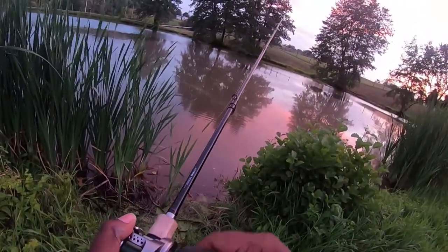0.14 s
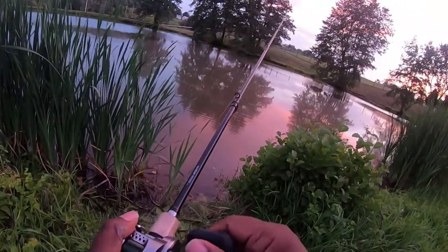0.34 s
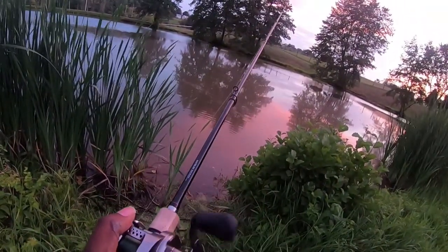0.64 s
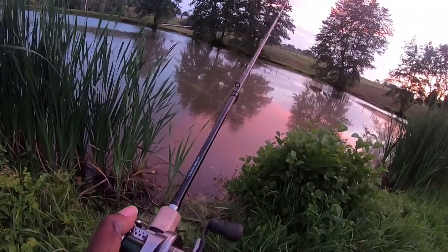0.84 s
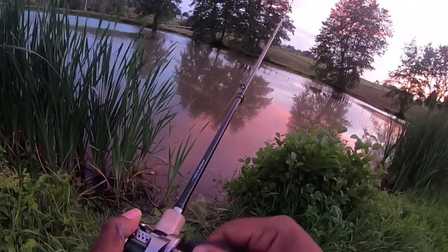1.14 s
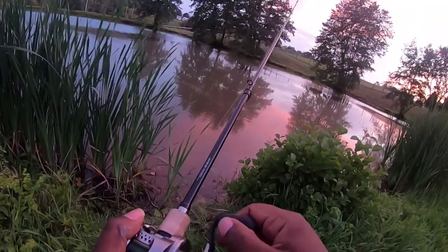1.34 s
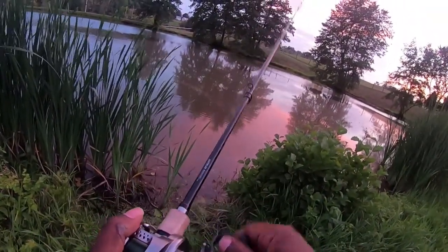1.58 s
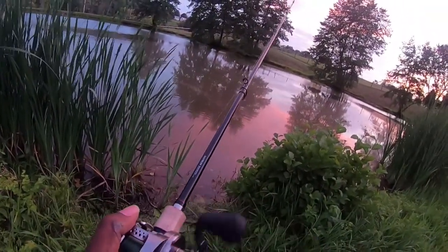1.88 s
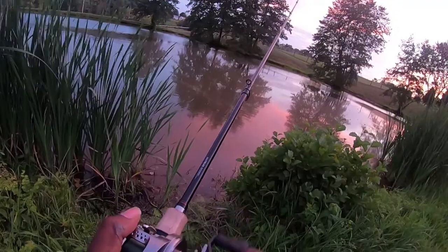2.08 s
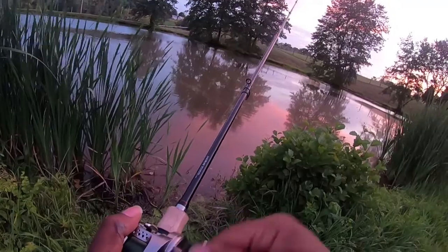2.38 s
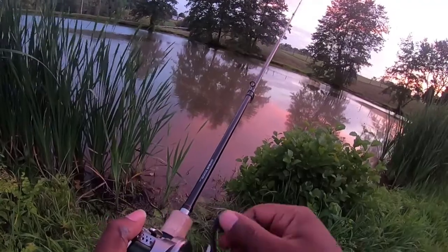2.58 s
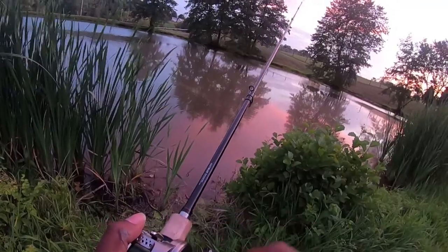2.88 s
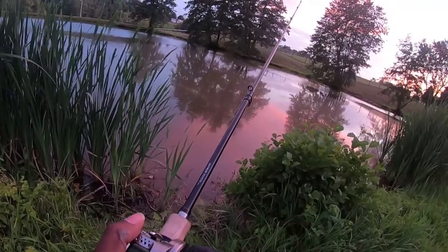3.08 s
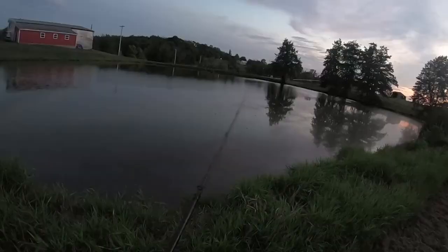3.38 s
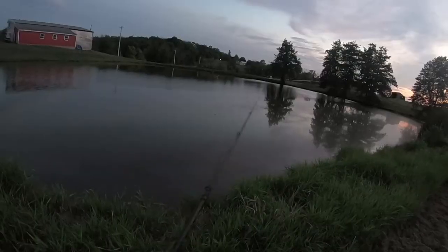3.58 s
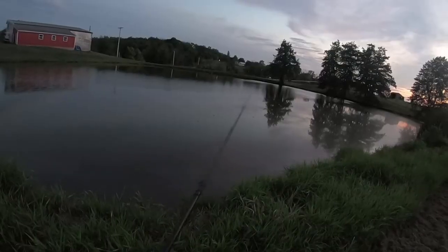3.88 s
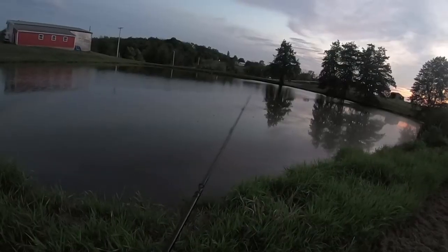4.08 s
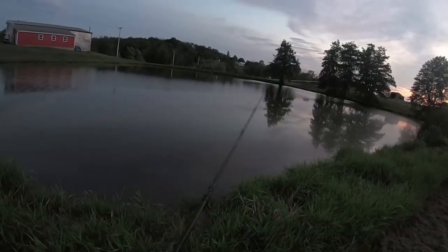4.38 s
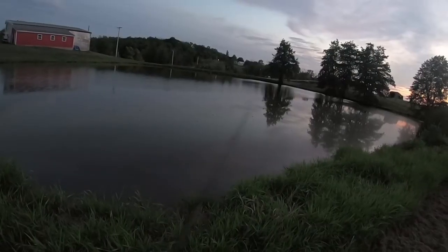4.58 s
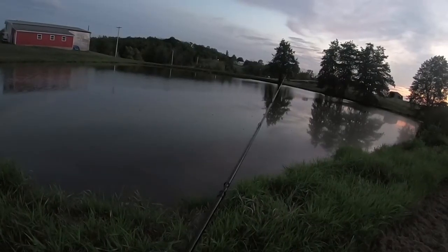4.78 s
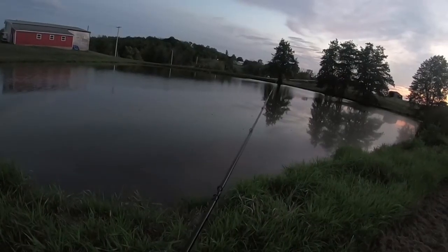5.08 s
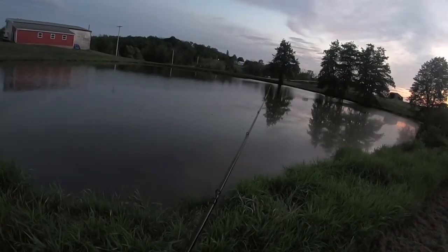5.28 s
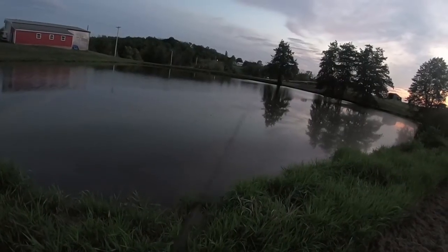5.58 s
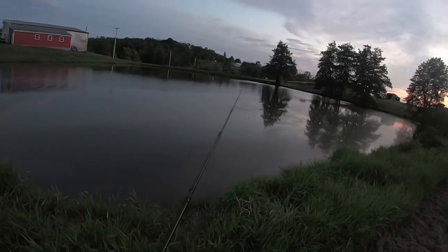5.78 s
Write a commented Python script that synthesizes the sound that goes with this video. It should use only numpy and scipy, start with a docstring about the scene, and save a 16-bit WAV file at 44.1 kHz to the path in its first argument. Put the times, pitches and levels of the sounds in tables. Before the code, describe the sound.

A close, high-pitched insect chorus hisses in reeds beside a pond, over a faint, distant road rumble. A cicada buzzes in surges about three times a second, growing louder, each ending in a small rising squeak, most with a rasp. At 0.2 seconds one short knock bumps the microphone. Low wind gusts buffet it until about 2 seconds, strongest near 0.1 and 0.6. A cricket gives short, pure chirps between 0.7 and 1.8 seconds, and a faint katydid ticks then buzzes thinly around 0.5 and 1.9. At 3.4 seconds the sound cuts abruptly to the quieter open bank, with the chorus farther off. Crickets trill, one insect buzzes in short bouts, and a small frog on the right peeps softly about twice a second. A distant pump motor hums low, throbbing gently and growing slightly louder from 4.1 seconds until the end, near 6 seconds.

```python
"""Dusk at a pond

First we stand in the reeds, close to a chorus of insects scraping their wings. A cicada surges, a
katydid ticks and buzzes, a cricket chirps and a breeze rumbles on the microphone. Then we are suddenly
on the open bank: the chorus is farther off, crickets trill, a small frog peeps through its ringing
throat and a distant pump motor hums louder. Land and road rumble far away in both spots."""
import sys
import numpy as np
from scipy import signal
from scipy.fft import rfft, irfft
from scipy.io import wavfile
from scipy.ndimage import map_coordinates

SR = 44100
rng = np.random.default_rng(int(sys.argv[2]) if len(sys.argv) > 2 else 0)


def put_to_file(sound):
    """Save the sound as 16-bit audio at rate SR, in the file named by the first command-line argument."""
    columns = np.atleast_2d(sound).T  # one column per channel
    safe = np.clip(columns, -1, 1)
    whole_steps = np.round(safe * 32767)
    wavfile.write(sys.argv[1], SR, whole_steps.astype(np.int16))


N = 261954
T = np.arange(N) / SR
HZ = np.maximum(np.fft.rfftfreq(N, 1 / SR), 1)
MOVE_S = 3.361   # when we jump from the reeds to the bank

# The basic tone of the insect crowd and far air noise.
# Each row: pitch in Hz, left and right level in dB per Hz, how alike the sides are from 0 to 1.
REED_CHORUS = [(284, -84.5, -83, 0.7), (545, -96.5, -96.5, 0.03), (1560, -91, -93.5, 0),
               (2110, -94.5, -95.5, 0.1), (3020, -94.5, -89.5, 0.6), (3444, -83, -84.5, 0.6),
               (3970, -81, -77.5, 0.74), (4420, -77, -77.5, 0.68), (5750, -74.5, -72.5, 0),
               (6470, -77.5, -76, 0), (7380, -78.5, -75, 0.48), (7820, -91, -81.5, 0.44),
               (9230, -86.5, -87.5, 0.35), (10870, -95.5, -99.4, 0), (12400, -100, -98, 0.1),
               (13700, -99.5, -102.8, 0.2), (15600.0, -111.9, -110.3, 0.38)]
BANK_CHORUS = [(293, -80.5, -80, 0.86), (577, -94, -91.5, 0.26), (900.0, -86.5, -92, 0.14),
               (1630, -86.5, -90, 0.42), (2010, -91.5, -99, 0.18), (2890, -90.5, -82.5, 0.32),
               (3200, -88.5, -86, 0.47), (4700, -87.0, -83.5, 0.58), (5800, -83, -81.5, 0.23),
               (6430, -93, -83, 0.52), (7020, -79.5, -77, 0.54), (7400, -89, -88, 0.58),
               (8500, -92, -91.5, 0.29), (10330, -104.0, -104.7, 0.15), (11000, -110.3, -111.2, 0.38),
               (13600, -115.8, -116.2, 0.34), (15600.0, -136.5, -136.3, 0.85)]
# Pitches that stand out or dip in the hiss of insects and far air.
# Each row: pitch in Hz, width in Hz, boost in dB.
REED_HISS_PITCHES = [(764, 330, 6), (3323, 120, 6), (3760, 60, 4), (4100, 150, 4.5), (4425, 35, 3),
                     (4952, 50, 4), (5264, 50, 3), (6400, 200, -3), (8440, 430, 5.5)]
BANK_HISS_PITCHES = [(2470, 58, 3.4), (2965, 150, 3.6), (7450, 100, 2.3), (10400, 160, 4.5)]
# The two microphone openings sit apart, so a wave meets them at different points in its cycle.
# Each row: pitch in Hz, how far the right side is ahead in radians.
REED_RIGHT_LEAD = [(6400, 0), (7300, 2.6), (7900, 3), (9500, 2.1), (11000, .2), (12300, .5), (14000, -.8)]
BANK_RIGHT_LEAD = [(4000, 0), (4500, .4), (5600, 1.8), (6300, 1.8), (7700, 2.8), (8800, 1.9), (10400, 2.7),
                   (11200, 0)]

# Pitches at which the cicada's body, its upper ring and the katydid's wing ring most easily.
# Each row: pitch in Hz, width in Hz, relative level in dB.
CICADA_BODY = [(4050, 300, -8), (5190, 380, -4), (5880, 620, -6), (6606, 180, -7)]
CICADA_RING = [(5850, 300, 0), (6070, 220, -3)]
KATYDID_WING = [(10000, 1400, -3), (12300, 1400, 0), (13500, 2000, -1.5)]
# The cicada's lower rasps and the katydid's single strokes. Each row: middle in seconds, level in dB.
CICADA_RASPS = [(.657, -43.5), (.97, -47), (1.655, -44), (2.30, -43), (2.625, -44.5), (2.94, -44.5),
                (3.25, -48)]
KATYDID_TICKS = [(.472, -63), (.530, -60.5), (.593, -61), (1.861, -61), (1.918, -60), (1.982, -59)]
# The katydid's buzzes. Each row: start in seconds, end in seconds, level in dB.
KATYDID_SONGS = [(0.63, 1.33, -64.5), (2.04, 2.862, -63.5)]
# Cricket notes in the reeds. Each row: start in seconds, peak level in dB, starting pitch in Hz.
CRICKET_CHIRPS = [(0.732, -42, 4600), (1.085, -42.5, 4650), (1.12, -45, 4680), (1.46, -42, 4660),
                  (1.832, -45, 4650)]
# Crickets on the bank. Each row: pitch in Hz, width in Hz, pulses per second, pulse depth from 0 to 1,
# level in dB as we arrive and at the end, left minus right in dB, Hz below pitch as we arrive.
CRICKET_TRILLS = [(8500, 110, 54.85, .8, -67, -61, -2, 230), (7000, 380, 6.6, .5, -62, -62, -3, 0)]
# Bouts of buzzing on the bank. Each row: start in seconds, end in seconds, final level in dB.
BUZZ_BOUTS = [(3.78, 3.91, -56), (3.99, 4.35, -52.5), (4.5, 4.81, -55.5), (5.09, 5.28, -55.5),
              (5.36, 5.6, -57), (5.64, 5.76, -56)]
# The frog's peeps. Each row: time in seconds, then peak dB of the low, middle and high throat pitch.
FROG_PEEPS = [(3.4625, -58, -60, -52.5), (3.92, -63, -58, -57), (4.385, -66, -63, -60),
              (4.84, -64, -57.5, -58), (5.278, -58.5, -66, -58.5), (5.722, -56.5, -66, -60)]
# Where the frog's throat rings. Each row: pitch in Hz, width in Hz.
FROG_THROAT = [(3510, 60), (4090, 200), (4385, 130)]

# Gusts on the microphone. Each row: time of full strength in seconds, level in dB, hold in seconds.
BREEZE_GUSTS = [(0.07, -37, 0.06), (0.568, -36, 0.15), (1.26, -46, .02), (1.367, -43, 0.15),
                (1.69, -41.5, 0.055), (1.975, -50, 0.077), (2.66, -55, .06)]
# The tone of a gust. Each row: pitch in Hz, relative level in dB.
GUST_TONE = [(15, -24), (30, -4), (60, -2.5), (100, -9), (160, -16), (300, -42.5)]
# The motor's tones, each a sum of multiples of the shaft speed and the mains frequency.
# Each row: shaft multiple, mains multiple, base level in dB in the reeds, the same on the bank.
MOTOR_TONES = [(1, 0, -67, -69), (2, 0, -85, -64), (0, 2, -68, -58.5), (4, 0, -66, -57.5),
               (2, 2, -69, -59.5), (0, 4, -71, -64), (3, 2, -79, -68), (1, 4, -85, -66)]
# The tone of far land and road. Each row: pitch in Hz, base level in dB per Hz.
REED_RUMBLE_TONE = [(15, -93), (30, -76), (70, -83), (155, -72.5), (210, -79), (300, -87.5), (420, -110)]
BANK_RUMBLE_TONE = [(15, -91), (30, -76.5), (75, -74), (160, -72.5), (215, -75.5), (300, -84), (420, -100)]


def chorus(tone, lead, pitches, swell, shrill_hz, waver_db):
    """Countless scraping wings and far air blend into a hiss; each half-octave band wavers by itself."""
    spectrum = stereo_noise(*by_pitch(tone), *by_pitch(lead))
    spectrum *= (HZ / tone[0][0]).clip(0, 1) ** 4   # fade out the bass
    for hz, width_hz, boost_db in pitches:
        spectrum *= from_db(boost_db * abs(resonance(hz, width_hz)) ** 2)
    air_db, singers_db, shrill_db = swell
    singing_hz = 2400   # below this there is only far air noise
    out = 0
    for octave in np.arange(np.log2(250), np.log2(20000), 1 / 2):
        band = (1 - 2 * abs(np.log2(HZ) - octave)).clip(0, 1)
        hz = 2 ** octave
        swell_db = shrill_db if hz > shrill_hz else singers_db if hz > singing_hz else air_db
        waver = drift(2) + .6 * drift(6)
        out = out + irfft(spectrum * band, N) * from_db(swell_db + waver_db * waver)
    return out


def reed_swell(break_times_s=(.55, 2.88), come_back_s=.35):
    """In the reeds the air settles, the main singers grow, and the shrill ones drop and come back."""
    air_db = -2 * (1 - np.exp(-T / .63))
    singers_db = -.71 + .52 * T
    shrill_db = sum(-6 * (T > s) * np.exp(-(T - s).clip(0) / come_back_s) for s in break_times_s)
    return air_db, singers_db, shrill_db


def bank_swell(fade_s=.25, return_s=5.3):
    """On the bank the air eases, the main singers hold, and the shrill ones fade and then return."""
    air_db = 1.2 - .9 * (T - MOVE_S)
    singers_db, lull_db = -.94, -1.3
    fading_db = 7 * np.exp(-(T - MOVE_S).clip(0) / fade_s)
    return_db = 8.5 / (1 + np.exp((return_s - T) / .16))
    return air_db, singers_db, lull_db + fading_db + return_db


def cicada(gap_s=.3425, quicken_s=.005, squeak_s=.072, squeak_hz=5320, rise_hz_per_s=3500):
    """Its body buzzes in ever faster, louder surges; each ends in a rising squeak, most in a rasp too."""
    k = np.arange(11)
    surge_ends_s = .3 + gap_s * k - quicken_s * k * (k - 1) / 2
    peaks_db = -43.5 + .5 * k
    outline = [(0, peaks_db[0] - 7)]
    squeaks = 0
    for s, db in zip(surge_ends_s, peaks_db):
        outline += [(s - .07, db - 3), (s - .02, db), (s + .03, db - 7)]   # climb, peak, drop
        cycles = (squeak_hz + rise_hz_per_s * (T - s) / 2) * (T - s)
        squeaks += from_db(db - 3.5) * hump(s - .75 * squeak_s, squeak_s) * np.sin(2 * np.pi * cycles)
    surges = from_db(columns(outline, T)[0]) * buzz(CICADA_BODY)
    # The upper ring holds through each surge and breaks off briefly after it.
    ring = sum(from_db(db + 2 * drift(4)) * buzz([(hz, width, 0)]) for hz, width, db in CICADA_RING)
    breaks = sum(hump(s, .075) for s in surge_ends_s)
    ring *= from_db(-56.5 + 2.2 * T) * (1 - .9 * breaks)
    rasps = bursts(CICADA_RASPS, length_s=.05) * buzz([(4350, 750, 0)])
    squeaks *= .6 + .3 * drift(44.95)   # a fast flutter
    return panned(surges + ring + rasps + squeaks, -1.5)


def katydid(strokes_per_s=46.37):
    """A few single wing strokes tick, then a run of fast ones makes a buzz."""
    loudness = bursts(KATYDID_TICKS, length_s=.03)
    for start_s, end_s, db in KATYDID_SONGS:
        strokes = 1 + .48 * np.cos(2 * np.pi * strokes_per_s * (T - start_s - .0105))
        loudness += from_db(db) * strokes * gate(start_s, end_s, rise_s=.22, fall_s=.002)
    return panned(loudness * buzz(KATYDID_WING), 4.3)


def cricket(chirp_s=.048, fall_hz_per_s=1800):
    """A cricket chirps short, pure notes that slide down."""
    out = 0
    for s, db, hz in CRICKET_CHIRPS:
        cycles = (hz - fall_hz_per_s * (T - s) / 2) * (T - s)
        out += from_db(db) * hump(s, chirp_s) ** .5 * np.sin(2 * np.pi * cycles)
    return panned(out, 3)


def bank_singers(in_tune_s=5.0, left_lag_samples=2):
    """To the right, one insect buzzes and two crickets trill, each at its own rate of wing strokes."""
    out = panned(buzzing_bouts(), -.55)
    for hz, width_hz, per_s, depth, arrival_db, end_db, pan_db, flat_hz in CRICKET_TRILLS:
        pulses = 1 + depth * np.cos(2 * np.pi * per_s * (T - 3.4025))
        level = from_db(np.interp(T, [MOVE_S, N / SR], [arrival_db, end_db]) + 2.5 * drift(3))
        # A singer that starts too low creeps up to its pitch.
        cycles_behind = np.cumsum(np.interp(T, [MOVE_S, in_tune_s], [flat_hz, 0])) / SR
        wing = signal.hilbert(buzz([(hz, width_hz, 0)]))
        trill = np.real(wing * np.exp(-2j * np.pi * cycles_behind))
        out += panned(level * pulses * trill, pan_db)
    return np.array([np.roll(out[0], left_lag_samples), out[1]])   # the left side hears it later


def buzzing_bouts(swell_db_per_s=14):
    """A broad insect buzz swells in each bout, then drops back to a quiet level."""
    loudness = from_db(-67.5)
    for start_s, end_s, db in BUZZ_BOUTS:
        swell = from_db(db + swell_db_per_s * (T - end_s).clip(-1, 0))
        loudness = loudness + swell * gate(start_s, end_s, rise_s=.05, fall_s=.05)
    return loudness * buzz([(5610, 320, -2.5), (5880, 590, -.83)])


def frog(peep_s=.081):
    """Short raspy peeps ring in the throat, each with its own mix of three pitches."""
    rings = np.array([buzz([(hz, width_hz, 0)]) for hz, width_hz in FROG_THROAT])
    peeps = sum(hump(s - .01, peep_s) ** .5 * (from_db(mix_db) @ rings) for s, *mix_db in FROG_PEEPS)
    return panned(peeps, -8)


def breeze(rise_db_per_s=91, fall_db_per_s=81):
    """Gusts build, hold and die away, pushing unevenly on each microphone opening."""
    tone = from_db(by_pitch(GUST_TONE)[0] - 37 * (HZ > 400))
    pressure = rms_one(irfft(click_spectra(per_s=500) * tone, N))
    gusts_db = [db - rise_db_per_s * (s - T).clip(0) - fall_db_per_s * (T - s - hold_s).clip(0)
                for s, db, hold_s in BREEZE_GUSTS]
    level_db = np.max(gusts_db, axis=0) + 2.2 * drift(9)   # the strongest gust wins
    return pressure * from_db(level_db + [[1.5], [-.4]])   # a little louder on the left


def knock(at_s=.2058, db=-30, hz=175, width_s=.004):
    """One bump against the microphone's housing: a pull that snaps back."""
    since = T - at_s
    return -from_db(db) * np.cos(2 * np.pi * hz * since.clip(0)) * np.exp(-(since / width_s) ** 2)


def motor(on_bank, beat_peak_s, shaft_hz=58.6, mains_hz=60):
    """The pump's shaft slips behind the mains, so nearby tones throb about three times a second."""
    out = 0
    for shaft_multiple, mains_multiple, reeds_db, bank_db in MOTOR_TONES:
        hz = shaft_multiple * shaft_hz + mains_multiple * mains_hz
        # Moving air makes each tone waver on its way to us.
        level = from_db((bank_db if on_bank else reeds_db) + 1.3 * drift(7))
        phase = 2 * np.pi * hz * (T - beat_peak_s) + .2 * drift(7)
        out += np.sqrt(2) * level * np.cos(phase)
    return out


def rumble(tone, alike):
    """Low noise from far land and road swells and sinks, nearly the same on both sides."""
    top_hz = 1.3 * tone[-1][0]
    level_db = by_pitch(tone)[0] - 40 * (HZ > top_hz)
    spectrum = stereo_noise(level_db - .5, level_db + .5, alike, lead=0)
    return irfft(spectrum, N) * from_db(1.9 * drift(4))


def buzz(rings):
    """Dense clicks through a ringing body. Each ring: pitch in Hz, width in Hz, relative level in dB."""
    body = sum(from_db(db) * resonance(hz, width_hz) ** 2 for hz, width_hz, db in rings)
    return rms_one(irfft(click_spectra(per_s=40000)[0] * body, N))


def stereo_noise(left_db, right_db, alike, lead):
    """Left and right noise spectra that are partly shared; the shared part is ahead on the right."""
    shared, separate = click_spectra(per_s=40000)
    alike = np.clip(alike, 0, .99)
    right = alike * np.exp(1j * lead) * shared + np.sqrt(1 - alike ** 2) * separate
    return np.array([from_db(left_db) * shared, from_db(right_db) * right])


def click_spectra(per_s):
    """Two separate streams of random clicks, like wing teeth catching, as spectra at 0 dB per Hz."""
    clicks = (rng.random((2, N)) < per_s / SR) * rng.standard_normal((2, N))
    return rfft(rms_one(clicks)) * np.sqrt(SR / 2)


def resonance(hz, width_hz):
    """How a ringing part answers each pitch: 1 at its own, less further away."""
    return 1 / (1 + 2j * (HZ - hz) / width_hz)


def bursts(rows, length_s):
    """A loudness curve with one short hump for each row."""
    return sum(from_db(db) * hump(middle_s - length_s / 2, length_s) for middle_s, db in rows)


def hump(start_s, length_s):
    """A smooth rise and fall."""
    return np.sin(np.pi * ((T - start_s) / length_s).clip(0, 1)) ** 2


def gate(start_s, end_s, rise_s, fall_s):
    """Fade in, hold, fade out."""
    return ((T - start_s) / rise_s).clip(0, 1) * (1 - (T - end_s) / fall_s).clip(0, 1)


def drift(rate_hz):
    """A smooth random wobble, about 1 in size."""
    return map_coordinates(rng.standard_normal(800), [T * rate_hz * 2 + 2], order=3)


def panned(x, pan_db):
    """Make a sound stereo, with the left side pan_db above the right."""
    return x * from_db(np.multiply.outer([.5, -.5], pan_db)).reshape(2, -1)


def by_pitch(rows):
    """Spread a table over all pitches, octave by octave; its end values hold beyond it."""
    rows = np.array(rows, float)
    return columns(np.c_[np.log(rows[:, 0]), rows[:, 1:]], np.log(HZ))


def columns(rows, along):
    """Join the rows with straight lines and read each later column at points along the first."""
    first, *rest = np.transpose(rows)
    return [np.interp(along, first, column) for column in rest]


def from_db(db):
    """Turn decibels into a number to multiply by."""
    return 10 ** (np.asarray(db) / 20)


def rms_one(x):
    """Scale a sound to an average strength (rms) of 1."""
    return x / np.sqrt(np.mean(x ** 2))


def scene():
    """The reeds until the move, then the bank."""
    reeds = chorus(REED_CHORUS, REED_RIGHT_LEAD, REED_HISS_PITCHES, reed_swell(),
                   shrill_hz=10500, waver_db=.76)
    reeds += cicada() + katydid() + cricket() + breeze() + knock()
    far_sounds = motor(on_bank=False, beat_peak_s=1.476) + rumble(REED_RUMBLE_TONE, alike=.96)
    reeds += far_sounds * from_db(reed_swell()[0])   # they sink as the air settles

    bank = chorus(BANK_CHORUS, BANK_RIGHT_LEAD, BANK_HISS_PITCHES, bank_swell(),
                  shrill_hz=8800, waver_db=.6)
    bank += bank_singers() + frog()
    idling = 1 - gate(4.1, N / SR, rise_s=.1, fall_s=1)   # the motor is softer until it takes load
    bank += motor(on_bank=True, beat_peak_s=4.263) * from_db(-4 * idling)
    bank += rumble(BANK_RUMBLE_TONE, alike=.97)
    return np.where(T < MOVE_S, reeds, bank)


def record(dry, cutoff_hz=15730):
    """The very highest treble is cut off steeply."""
    return signal.sosfilt(signal.ellip(14, .5, 70, cutoff_hz, fs=SR, output="sos"), dry)


dry = scene()
out = record(dry)
put_to_file(out)
```